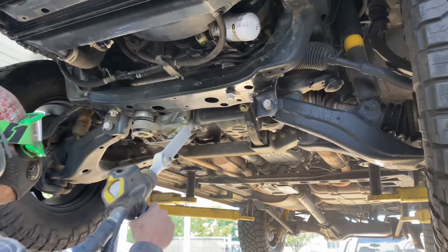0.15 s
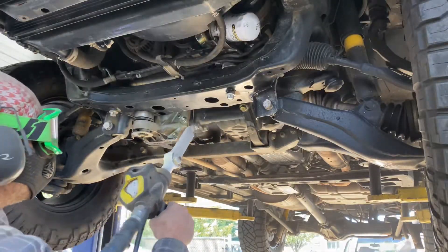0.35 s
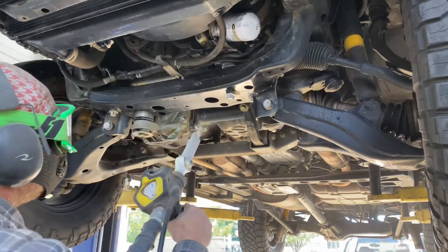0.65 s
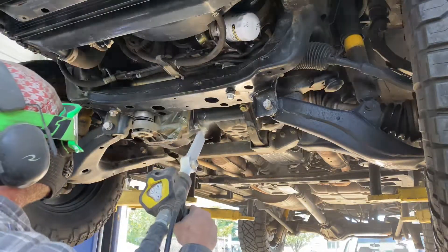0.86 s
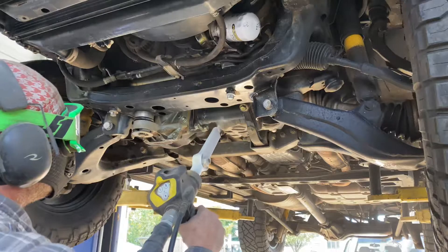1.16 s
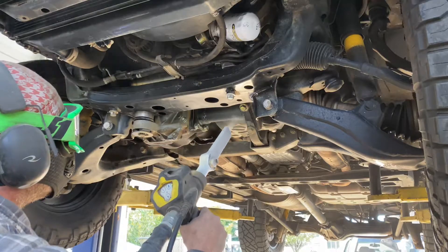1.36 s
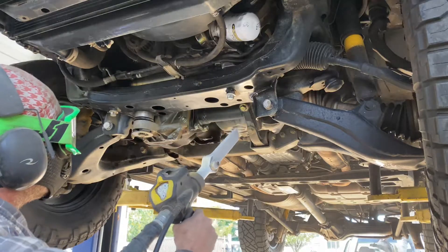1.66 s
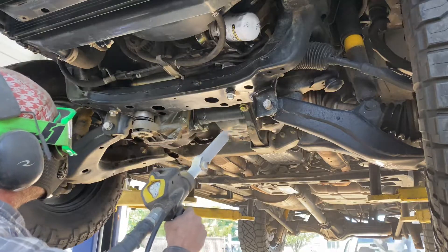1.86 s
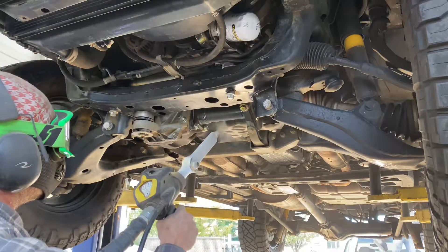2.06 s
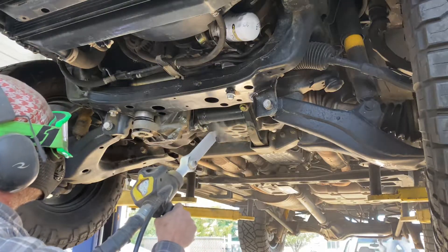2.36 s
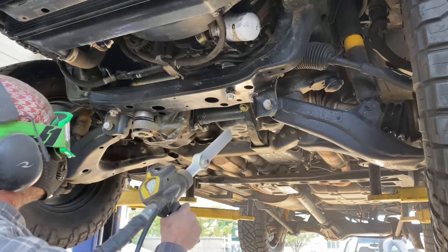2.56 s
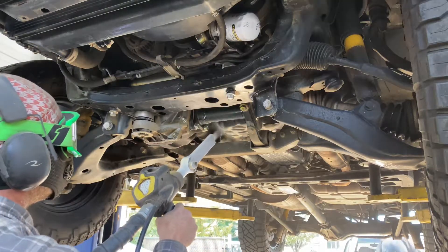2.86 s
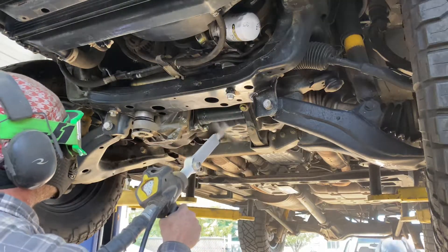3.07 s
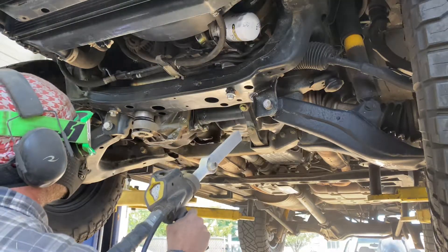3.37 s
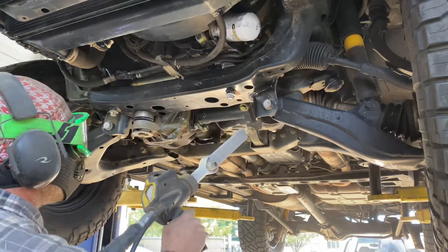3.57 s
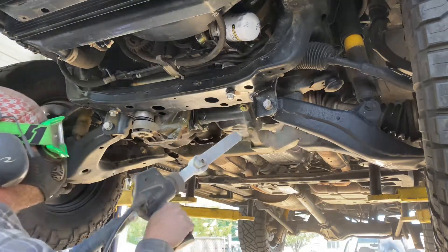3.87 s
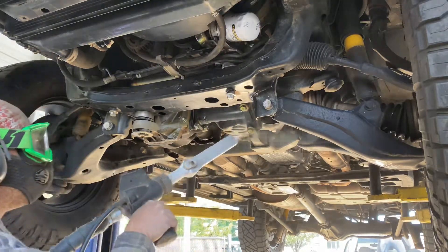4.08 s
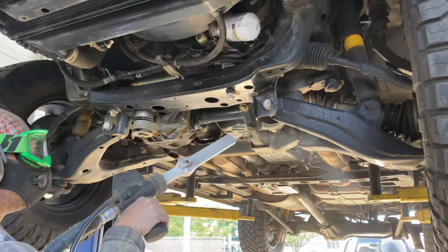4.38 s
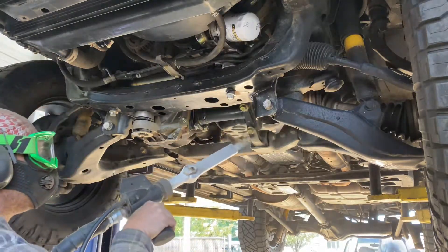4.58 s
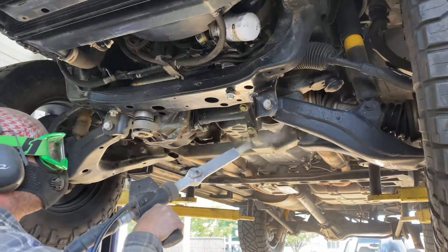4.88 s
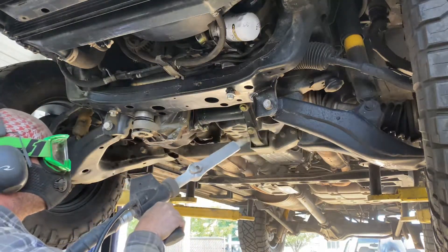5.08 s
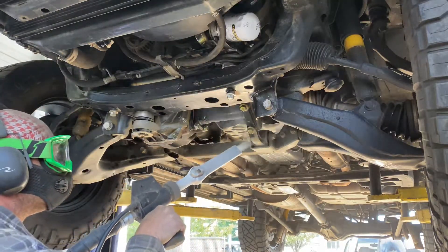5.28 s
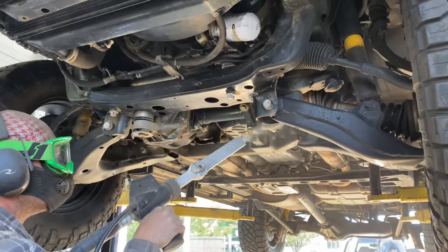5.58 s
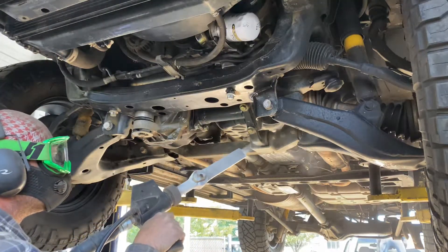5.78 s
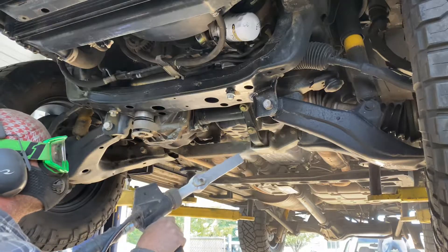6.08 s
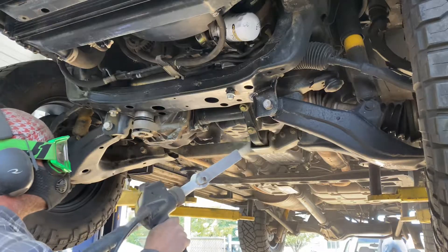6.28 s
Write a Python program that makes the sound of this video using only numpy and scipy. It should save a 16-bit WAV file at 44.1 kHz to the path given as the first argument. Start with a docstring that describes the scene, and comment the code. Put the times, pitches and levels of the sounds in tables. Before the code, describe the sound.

A dry ice blaster hisses loudly and continuously against a truck's underside, its bright airy jet surging, splashing on steel and buffeting the microphone midway.

```python
"""A hissing, splashing jet of air: a dry ice blaster sweeps the underside of a truck on a workshop lift,
an arm's length from two microphones. The jet roars in hollows, rings openings, rumbles back off the chassis
and throws gusts at the microphones: all noise, shaped as short-time spectra and combed by echoes.
Pellets tick as band-passed random impulses; further away a compressor hums as wavering harmonic tones."""
import sys
import numpy as np
from scipy import signal
from scipy.io import wavfile
from scipy.ndimage import uniform_filter1d

SR = 44100
rng = np.random.default_rng(int(sys.argv[2]) if len(sys.argv) > 2 else 0)


def log_audio(samples):
    """Write samples as a 16-bit WAV file to the path given in sys.argv[1]."""
    # one column per channel
    frames = np.atleast_2d(samples).T
    # limit to full scale, then quantise
    limited = np.clip(frames, -1, 1)
    pcm = np.round(limited * 32767).astype(np.int16)
    wavfile.write(sys.argv[1], SR, pcm)


N = 284004
TIME = np.arange(N) / SR
WINDOW, HOP = 2048, 512  # short-time spectra, samples
FRAME_S = np.arange(N // HOP + 5)[:, None] * HOP / SR
BIN_HZ = np.fft.rfftfreq(WINDOW, 1 / SR)

# the slow sweep of the gun: t/s, nozzle hiss level/dB, splash on steel level/dB, roar in hollows level/dB
SWEEP = [(0, -24, -31, -43.5), (.45, -21.3, -32.5, -43), (.7, -26, -29, -40), (.85, -27.5, -31.5, -41),
         (1.15, -28.5, -33, -35.5), (1.44, -27.5, -29.5, -32), (1.62, -30, -31.5, -32.5),
         (1.88, -27, -30, -34), (2.0, -29.5, -31, -36.5), (2.18, -29, -35, -33.5), (2.34, -29, -31.5, -36),
         (2.88, -29, -33.5, -36), (3.1, -28, -31, -36), (3.27, -29.5, -30.5, -32.5),
         (3.74, -18.5, -27.5, -38.5), (3.8, -19.3, -27, -39), (3.92, -20, -27.5, -47),
         (4.06, -22, -29.5, -44.5), (4.18, -22.5, -29, -40), (4.38, -23, -30, -45), (4.48, -26, -30, -39.5),
         (4.72, -22.5, -26, -41), (4.9, -26.5, -28, -38.5), (4.97, -28, -30, -39),
         (5.03, -27.5, -29.5, -33.5), (5.1, -24.5, -28.5, -35.5), (5.21, -23.5, -27, -37.5),
         (5.44, -21.5, -32, -38.5), (5.52, -22.5, -38, -41.5), (5.58, -19.5, -39, -47),
         (5.65, -23, -34.5, -41), (5.73, -26, -29.5, -38.5), (5.95, -24, -27.5, -41),
         (6.2, -26.5, -30.5, -46), (6.33, -31, -32, -46)]


def gain_of(db):
    """Decibels to amplitude."""
    return 10 ** (np.asarray(db) / 20)


def evened(x):
    """Scales to rms 1."""
    return x / np.sqrt(np.mean(x ** 2) + 1e-20)


def read(points):
    """A table over frequency, joined by lines on a log axis."""
    hz, value = np.transpose(points)
    return np.interp(np.log(BIN_HZ + 1), np.log(hz + 1), value)


def follow(rows, t):
    """Each column of a table over time, at the times t."""
    s, *columns = np.transpose(rows)
    return np.array([np.interp(t, s, column) for column in columns])


def wander(t, slowest, fastest):
    """Random drift of rms 1: sines between two rates in Hz, the slow ones strongest."""
    rates = np.geomspace(slowest, fastest, num=24)
    return evened(sum(np.sin(2 * np.pi * (f * t + rng.random())) / np.sqrt(f) for f in rates))


def bell(hz, width_hz):
    """Power response of a resonance."""
    return 1 / (1 + (2 * (BIN_HZ - hz) / width_hz) ** 2)


def above(hz):
    """Power response of a high-pass."""
    return BIN_HZ ** 4 / (BIN_HZ ** 4 + hz ** 4)


def burst(start, length, attack_s, release_s):
    """A rush of air rises, holds until its length is over, and dies away."""
    age = FRAME_S - start
    return np.clip(age / attack_s, 0, 1) * np.exp(-np.maximum(age - length, 0) / release_s)


def band_power(shape, level_db):
    """Spreads a level over frequency according to a power shape."""
    return gain_of(level_db) ** 2 * shape / shape.sum(axis=-1, keepdims=True)


def air_power(spectrum, level_db):
    """Power over time and frequency of one air noise."""
    return band_power(gain_of(read(spectrum)) ** 2, level_db)


def port_noise(likeness, lead, balance_db):
    """Turbulence as short-time spectra at two microphone ports, partly alike and shifted in phase."""
    a, b, c, d = rng.standard_normal((4, len(FRAME_S), len(BIN_HZ)))
    likeness = np.clip(likeness, 0, 1)
    left = a + 1j * b
    unlike = np.sqrt(1 - likeness ** 2) * (c + 1j * d)
    right = (likeness * left + unlike) * np.exp(-1j * lead)
    lean = gain_of(balance_db / 2)
    return np.array([left * lean, right / lean])


def to_sound(z):
    """Short-time spectra to samples."""
    return signal.istft(z.swapaxes(1, 2), nperseg=WINDOW, noverlap=WINDOW - HOP)[1][:, :N]


def jet_power(gusty_db):
    """The free jet hisses; where it lands it splashes and roars. Each surge adds hiss and splash."""
    # relative spectra of the three noises: f/Hz, level per Hz/dB
    nozzle = [(300, -46), (1500, -22), (3000, -12), (5000, -4.5), (6500, .2), (8100, .6), (8800, -.3),
              (9500, .2), (11000, -.4), (12500, -1.9), (13900, -1), (15700, -1.8)]
    splash = [(300, -38), (600, -25.5), (1400, -12.5), (1850, -7), (2100, -5.5), (2400, 0), (3000, 0.2),
              (3600, 0.5), (4800, 0.5), (5600, -3.5), (7000, -13.5), (10000, -17.5), (15700, -18)]
    roar = [(150, -28), (400, -17), (700, -6.5), (860, -3.5), (1000, -1.5), (1100, -3), (1350, -1.3),
            (1750, -4), (2100, -1.5), (3000, -12), (6000, -39)]
    # brief surges of the jet: start t/s, length/s, hiss level/dB, splash level/dB
    surges = [(0.414, 0.15, -30, -32.5), (0.613, 0.1, -27, -37), (1.438, 0.14, -26, -32),
              (2.343, 0.43, -27.5, -30), (3.043, 0.086, -30, -34), (3.28, 0.17, -19, -37),
              (3.46, 0.16, -22, -39), (4.086, 0.058, -41, -32), (4.283, 0.068, -26, -45),
              (4.824, 0.088, -24, -30), (5.43, 0.15, -28, -37), (6.06, 0.12, -26, -41)]
    nozzle_db, splash_db, roar_db = follow(SWEEP, FRAME_S)
    roar_db = roar_db + gusty_db * wander(FRAME_S, slowest=6, fastest=20)
    power = air_power(nozzle, nozzle_db) + air_power(splash, splash_db) + air_power(roar, roar_db)
    for start, length, hiss_db, spray_db in surges:
        surge = burst(start, length, attack_s=0.034, release_s=0.047)
        power = power + surge ** 2 * (air_power(nozzle, hiss_db) + air_power(splash, spray_db))
    return power


def swirl_power(lumpy_db):
    """Air thrown off the chassis rumbles in lumps."""
    # relative spectrum of the rumble: f/Hz, level per Hz/dB
    rumble = [(20, -46), (40, -21), (60, -1), (110, 0.5), (170, -4), (300, -3), (450, -3.5), (650, -3.5),
              (1000, -23), (2500, -37)]
    # the rumble is strongest midway through the sweep: t/s, level/dB
    swirl = [(0, -61), (.4, -61.5), (.8, -54), (1.35, -50.5), (1.85, -55), (2.25, -44.5), (2.8, -50),
             (3.3, -42.5), (3.8, -49.5), (4.25, -58), (4.5, -54), (4.9, -51.5), (5.25, -53), (5.55, -58),
             (5.95, -52.5), (6.44, -60)]
    lumps_db = lumpy_db * wander(FRAME_S, slowest=8, fastest=42)
    return air_power(rumble, follow(swirl, FRAME_S)[0] + lumps_db)


def jet_noise():
    """The air's turbulence at the two ports, following the gun's bearing."""
    # how alike the two ports are: f/Hz, left-right likeness/0-1
    alike = [(60, .85), (330, .8), (520, .52), (700, .45), (980, .6), (1100, .35), (1350, .65), (1700, .3),
             (2100, .6), (3000, .3), (4900, .48), (5600, .15), (6500, .66), (7200, .1), (8500, .35),
             (9400, .62), (9900, .98), (11000, .62), (11850, .995), (12300, .995), (12950, .58),
             (13900, .99), (15000, .58), (15500, .97)]
    # phase between the ports: f/Hz, lead of the left port/rad
    left_lead = [(50, .4), (280, .45), (600, .4), (1500, -.25), (2500, .55), (3100, 1.3), (4300, 1.15),
                 (5200, 2.1), (5650, 2.7), (5900, .2), (6700, .15), (8000, -1.6), (8500, -3.6), (8900, -5),
                 (9400, -5.2), (9800, -6.2), (10400, -6.4), (11850, -9.35), (12300, -9.5), (13500, -12.4),
                 (14400, -12.6), (15450, -15.6)]
    # level between the ports: f/Hz, left minus right level/dB
    port_balance = [(60, .8), (350, .6), (520, -.6), (800, .4), (1500, 1), (2500, .3), (4000, .8),
                    (5000, 2.3), (5600, -.8), (6200, .5), (7200, -1.5), (8600, 2.3), (9300, -1), (10000, 0)]
    # the gun drifts away from the left: t/s, extra left lead in the splash band/rad,
    # extra likeness from the direct path/0-1
    bearing = [(0, 1.2, .4), (.6, 1.2, .35), (1.1, .5, 0), (3.1, .4, 0), (3.6, -.3, 0), (4.4, -.4, -.1),
               (6.44, -.9, -.2)]
    turn, direct = follow(bearing, FRAME_S)
    likeness = read(alike) + direct * bell(5000, 1000)
    lead = read(left_lead) + turn * bell(5000, 6000) ** 2
    return port_noise(likeness, lead, read(port_balance))


def standing_db():
    """Each standing wave lifts or dips its own band, and drifts in pitch as the gun moves."""
    # standing waves between the chassis members: f/Hz, width/Hz, lift level/dB
    chassis = [(265, 33, 3.5), (335, 45, 1.5), (457, 27, 3.5), (672, 22, 2.5), (995, 44, 3), (1160, 45, 3),
               (1290, 42, 3), (1365, 59, 2), (1476, 70, 3), (1571, 32, 2.5), (2344, 30, 2),
               (3950, 38, -3.5), (4520, 200, 1), (4980, 170, 2), (5400, 40, 1), (6470, 130, 3),
               (8660, 250, 0), (10400, 310, 1.5)]
    drift = 0.01  # rms share of each pitch
    lift_db = 0
    for hz, width_hz, db in chassis:
        drifting_hz = hz * (1 + drift * wander(FRAME_S, slowest=0.304, fastest=3))
        lift_db = lift_db + db * bell(drifting_hz, width_hz)
    return lift_db


def reflections(strength, travel_s, longest_s, count):
    """Echoes off nearby steel comb the air noise; the teeth slide as the nozzle moves."""
    paths = 1
    for delay_s in np.geomspace(longest_s / 4, longest_s, count):
        moving_s = delay_s + travel_s * wander(FRAME_S, slowest=.15, fastest=1.5)
        paths = paths + strength * np.exp(-2j * np.pi * BIN_HZ * moving_s)
    return evened(abs(paths))


def blast(flutter_db, patchy_db):
    """The air noise, fluttering with the pellet feed, coloured by the chassis and by echoes at each port."""
    power = jet_power(gusty_db=0.55) + swirl_power(lumpy_db=0.5) + openings_power()
    # random blotches of level over time and frequency
    patches = rng.standard_normal((len(FRAME_S), len(BIN_HZ)))
    patches = uniform_filter1d(patches, size=8, axis=0)
    patches = evened(uniform_filter1d(patches, size=3, axis=1))
    patch_gain = evened(gain_of(patchy_db * patches))
    shared = reflections(strength=0.094, travel_s=0.000255, longest_s=.016, count=6)
    own = np.array([reflections(strength=0.076, travel_s=0.0002, longest_s=0.0046, count=3)
                    for port in range(2)])
    own = own ** (above(600) * bell(0, 16000))  # weak in the bass and towards the top
    spectra = jet_noise() * np.sqrt(power) * gain_of(standing_db())
    air = to_sound(spectra * patch_gain * shared * own)
    return air * gain_of(flutter_db * wander(TIME, slowest=12, fastest=65))


def pellets(per_s, spread_db, level_db):
    """Grains of dry ice shatter on steel: tiny bright ticks whose level follows the nozzle hiss."""
    sizes = gain_of(spread_db * np.minimum(rng.exponential(1, (2, N)), 4))
    struck = rng.random((2, N)) < per_s / SR
    hits = sizes * rng.choice([-1, 1], (2, N)) * struck
    band = signal.butter(4, [3000, 9000], "bandpass", fs=SR, output="sos")
    ticks = evened(signal.sosfilt(band, hits))
    return ticks * gain_of(follow(SWEEP, TIME)[0] + level_db)


def compressor(waver, throb_db, level_db, unsteady, left_db):
    """A hum swells and slowly fades, a little to the left; higher overtones flutter more at each port."""
    # the harmonics: multiple of the pitch, relative level/dB
    hum_orders = [(1, 0.5), (2, -4.5), (3, -12), (4, -18.5)]
    # swells over the steady level: middle t/s, length/s, lift level/dB
    hum_swells = [(1.29, 0.48, 7), (2.25, 0.7, 11), (3.15, 0.58, 10.5), (3.7, 0.34, 6.5), (6.0, 0.2, 4.5)]
    hum_hz, fade_db_per_s = 70.6, 0.16
    turns = np.cumsum(hum_hz * (1 + waver * wander(TIME, slowest=0.494, fastest=9.05))) / SR
    frames = FRAME_S[:, 0]
    hum = np.zeros((2, N))
    for k, db in hum_orders:
        tone = gain_of(db) * np.exp(2j * np.pi * (k * turns + rng.random()))
        for port in hum:
            # complex, so both level and phase flutter
            flutter = wander(frames, slowest=1.8, fastest=17) + 1j * wander(frames, slowest=2, fastest=14)
            flutter = np.interp(TIME, frames, flutter)
            port += (tone * (1 + unsteady * np.sqrt(k) * flutter)).real
    swell_db = sum(db * .5 ** ((2 * (TIME - s) / length) ** 2) for s, length, db in hum_swells)
    throbbing_db = throb_db * wander(TIME, slowest=2.8, fastest=7.3)
    hum_db = level_db - fade_db_per_s * TIME + swell_db + throbbing_db
    return evened(hum) * gain_of(hum_db) * gain_of([[left_db / 2], [-left_db / 2]])


def openings_power():
    """Each opening sounds as an airy resonance, bending and gusting, for as long as the jet covers it."""
    # openings that ring as the jet crosses them: middle t/s, duration/s, f/Hz, width/Hz, level/dB
    openings = [ (.17, 0.6, 3800, 450, -38), (0.704, 0.34, 560, 200, -52.5), (.85, 0.39, 837, 70, -48.5),
                (0.874, 0.16, 2590, 300, -43), (1.36, 0.18, 520, 220, -47), (1.438, 0.2, 1090, 280, -37.5),
                (1.58, 0.14, 1300, 400, -45), (1.52, .14, 2450, 350, -40), (1.542, 0.13, 4540, 900, -28.5),
                (1.705, 0.12, 1010, 200, -38), (2.08, 0.25, 540, 200, -46), (2.257, 0.15, 152, 35, -46.5),
                (2.922, 0.13, 514, 180, -43.5), (3.273, 0.089, 3730, 600, -37),
                (3.506, 0.1, 4600, 900, -26.5), (3.52, 0.21, 6600, 500, -30.5),
                (3.585, 0.06, 1000, 500, -39.5), (3.707, 0.079, 3850, 1900, -23.5),
                (3.714, 0.14, 5200, 500, -27), (4.118, 0.072, 2700, 600, -34), (4.004, 0.4, 4550, 500, -34),
                (4.508, 0.11, 4870, 350, -29.5), (4.714, 0.17, 4700, 500, -34),
                (4.52, 0.14, 730, 200, -45.5), (4.524, .13, 368, 130, -50.5), (4.671, 0.069, 430, 90, -45),
                (4.765, 0.19, 2330, 90, -36.5), (4.807, 0.16, 1560, 400, -37.5),
                (5.0, 0.13, 1200, 600, -35.5), (5.005, 0.14, 705, 240, -35.5),
                (5.025, 0.079, 440, 150, -43), (5.08, 0.39, 2370, 110, -45), (5.2, .2, 1380, 350, -40),
                (5.2, .12, 3500, 400, -34.5), (5.293, 0.08, 346, 190, -48), (5.41, 0.15, 960, 120, -43.5),
                (5.337, 0.19, 5100, 350, -32.5), (5.41, 0.086, 4400, 450, -32), (5.98, 0.23, 880, 100, -46),
                (5.98, 0.35, 1580, 400, -41), (6.3, 0.34, 1830, 880, -38), ]
    bend, flutter_db = 0.014, 0.5  # rms share of the pitch, rms dB
    cut = 0.59  # an opening radiates little below this share of its pitch
    power = 0
    for s, duration, hz, width_hz, db in openings:
        covered = .5 ** ((2 * (FRAME_S - s) / duration) ** 6)
        bent_hz = hz * (1 + bend * wander(FRAME_S, slowest=2, fastest=9))
        skirt_hz = width_hz / np.sqrt(np.sqrt(2) - 1)  # the squared bell is then width_hz wide at half power
        ring = bell(bent_hz, skirt_hz) ** 2 * above(cut * hz)
        gusting_db = db + flutter_db * wander(FRAME_S, slowest=6, fastest=22)
        power = power + covered * band_power(ring, gusting_db)
    return power


def gusts(left_db, lag_s, alike_hz):
    """Gusts buffet the left port first and hardest, some deeper than others; only their bass is alike."""
    # relative spectrum of a gust on the microphones: f/Hz, level per Hz/dB
    buffet = [(20, -42), (40, -19), (65, 9), (105, 2.5), (160, 4), (260, -1.5), (380, -1), (520, -2.5),
              (680, -9), (900, -20), (2000, -33)]
    # gusts thrown back: start t/s, length/s, level before the bass cut/dB, bass cut f/Hz
    gust_rows = [(2.165, 0.11, -46, 110), (2.866, 0.11, -54, 250), (3.343, 0.085, -29, 220),
                 (3.415, 0.11, -28.5, 150), (3.528, 0.092, -28.5, 135), (3.613, 0.065, -36.5, 50),
                 (3.782, 0.066, -47.5, 60), (3.93, 0.11, -50.5, 55), (4.13, 0.2, -53.5, 45)]
    power = 0
    for start, length, db, lowest_hz in gust_rows:
        rush = burst(start, length, attack_s=0.024, release_s=0.034)
        power = power + rush ** 2 * above(lowest_hz) * air_power(buffet, db)
    noise = port_noise(1 - above(alike_hz), 2 * np.pi * BIN_HZ * lag_s, left_db)
    return to_sound(noise * np.sqrt(power))


def scene():
    """Blast, pellets, compressor and gusts together."""
    air = blast(flutter_db=0.37, patchy_db=2.5)
    ticks = pellets(per_s=990, spread_db=0.5, level_db=-21)  # level under the nozzle hiss setting
    hum = compressor(waver=0.0057, throb_db=1.0, level_db=-59.0, unsteady=0.23, left_db=1.2)
    return air + ticks + hum + gusts(left_db=5.5, lag_s=0.0005, alike_hz=800)


def record(dry):
    """The recorder's band limit, a steep low-pass."""
    edge_hz = 15750
    low_pass = signal.firwin(511, edge_hz, window=("kaiser", 9), fs=SR)
    return signal.oaconvolve(dry, low_pass[None], "same")


dry = scene()
out = record(dry)
log_audio(out)
```